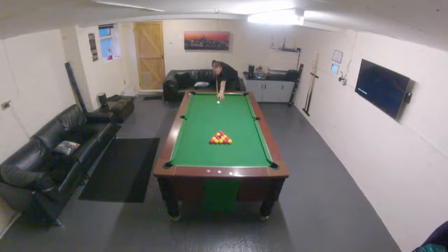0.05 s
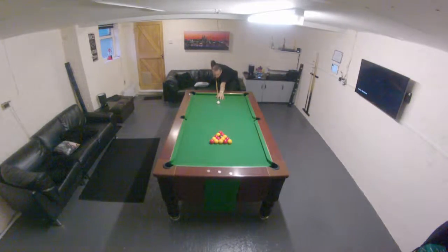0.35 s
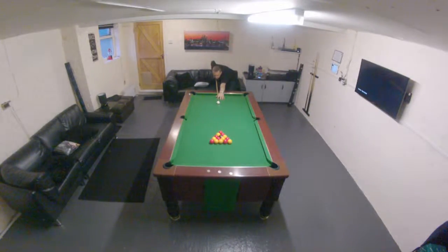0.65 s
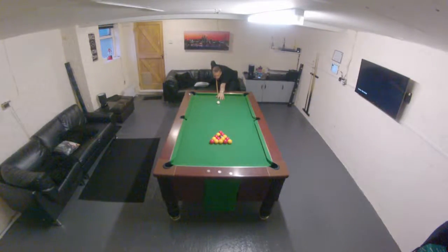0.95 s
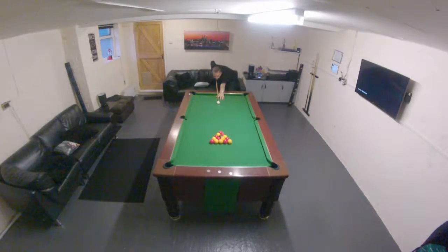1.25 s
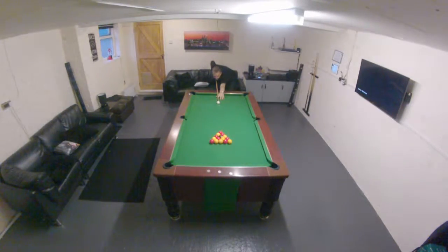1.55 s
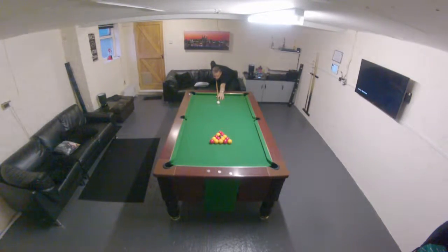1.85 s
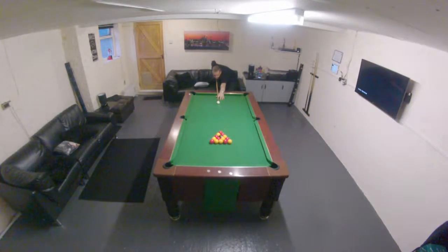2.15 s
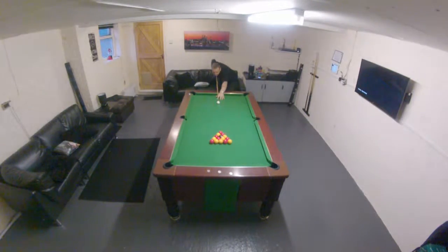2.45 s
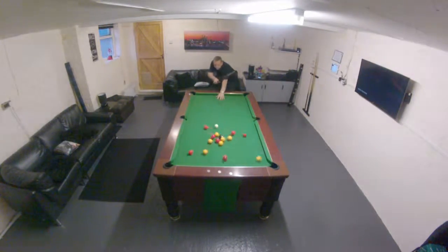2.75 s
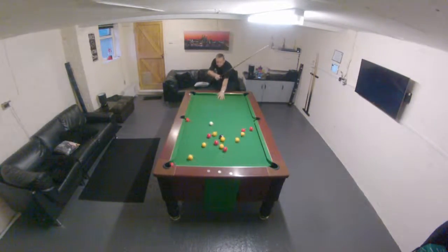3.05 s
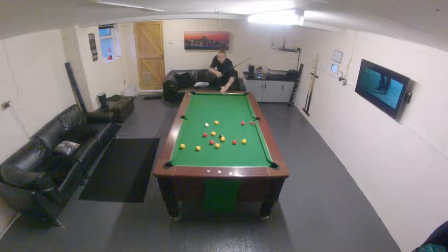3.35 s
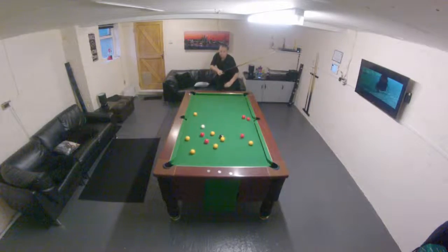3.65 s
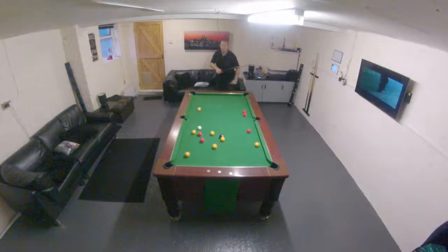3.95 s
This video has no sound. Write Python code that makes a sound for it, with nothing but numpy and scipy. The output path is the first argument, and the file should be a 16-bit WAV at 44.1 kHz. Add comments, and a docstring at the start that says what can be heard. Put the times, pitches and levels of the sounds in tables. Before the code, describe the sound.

A pool break: balls smash apart, then click and thump around the table in an echoing room.

```python
"""A bare, echoing games room: a pool break heard from the foot of the table.
A low hum fades and the cue slides over the hand. Its tip cracks against the white, which smashes into
the rack; the balls click together, thump the cushions and knock on the wooden rails and pockets, and one
rumbles away inside the table. Each contact is a short pulse plus room reflections, many with ringing
modes; the rumble is shaped noise. A limiter ducks after the smash."""
import sys
import numpy as np
from scipy import signal
from scipy.fft import rfft, irfft
from scipy.io import wavfile

SR = 44100
rng = np.random.default_rng(int(sys.argv[2]) if len(sys.argv) > 2 else 0)


def output_pcm(signal):
    """Save a mono or channel-first signal as 16-bit PCM at the path in sys.argv[1].

    Samples are clipped to [-1, 1] before scaling.
    """
    pcm = np.clip(np.atleast_2d(signal).T, -1, 1) * 32767
    wavfile.write(sys.argv[1], SR, np.round(pcm).astype(np.int16))


N = 176400
TIME = np.arange(N) / SR


def from_db(db):
    """Decibels to gain."""
    return 10 ** (np.asarray(db) / 20)


def unit_rms(x):
    """Scale to rms 1."""
    return x / np.sqrt(np.mean(x ** 2) + 1e-20)


def at_hz(points, hz):
    """Read a table on a log-frequency axis."""
    freq_hz, value = np.transpose(points)
    return np.interp(np.log(hz + 1), np.log(freq_hz), value)


def add(out, start_s, x):
    """Mix x into out from start_s."""
    i = int(start_s * SR)
    out[i:i + len(x)] += x[:N - i]


def noise(colour):
    """Steady noise of a given colour, rms 1."""
    gain = from_db(at_hz(colour, np.fft.rfftfreq(N, 1 / SR)))
    return unit_rms(irfft(rfft(rng.standard_normal(N)) * gain, N))


def drift(rate_hz):
    """Slow random wander, spread about 1."""
    return np.interp(TIME * rate_hz, np.arange(1000), rng.standard_normal(1000))


def contact(colour, tilt_db_per_oct, size=4096):
    """Minimum-phase pulse of one contact, with the energy of 10 ms at rms 1."""
    hz = np.fft.rfftfreq(size, 1 / SR)
    spectrum_db = at_hz(colour, hz) + tilt_db_per_oct * np.log2(hz + 20)
    cepstrum = irfft(np.log(from_db(spectrum_db)))
    cepstrum[1:size // 2] *= 2  # fold onto positive time
    cepstrum[size // 2 + 1:] = 0
    pulse = irfft(np.exp(rfft(cepstrum)))
    return unit_rms(pulse) * np.sqrt(.01 * SR / size)


def chatter(x, decay_s):
    """A rough contact: a dying burst of tiny touches."""
    t = TIME[:SR // 10]
    burst = rng.standard_normal(len(t)) * np.exp(-t / decay_s)
    return signal.fftconvolve(x, burst / np.sqrt(np.sum(burst ** 2)))


def room_tail(reflections_per_s=900, thicken_s=.05, gap_s=0.00077, build_s=0.004):
    """Reflections from one spot on the table: single at first, ever denser, dying band by band."""
    decays = [(80, 1), (250, 0.99), (1000, 0.7), (2800, 0.76), (5000, 0.6), (9000, 0.54), (15000, 0.32)]  # room decay: centre_hz, t60_s
    t, hz = TIME[:SR], np.fft.rfftfreq(SR, 1 / SR)
    density = np.minimum(reflections_per_s * (1 + t / thicken_s) ** 2 / SR, 1)
    arrivals = (rng.random(SR) < density) * rng.choice([-1, 1], SR) / np.sqrt(density)
    spectrum, tail = rfft(arrivals), 0
    for centre_hz, t60_s in decays:
        band = at_hz([(f, f == centre_hz) for f, _ in decays], hz)
        tail = tail + irfft(spectrum * band) * from_db(-60 * t / t60_s)
    return tail * np.clip((t - gap_s) / build_s, 0, 1) * np.sqrt(20 / SR)


def strikes(hits, colour, room_db, direct_hz, modes=(), echoes=(), chatter_s=None, swell_s=0.0072):
    """Per hit: a pulse, low-passed on the direct path, its echoes, the room's tail and a swelling ring."""
    out, t = np.zeros(N), TIME[:SR]
    lowpass = signal.butter(2, direct_hz, fs=SR, output="sos")
    swell = 1 - np.exp(-t / swell_s)
    for start_s, level_db, tilt_db_per_oct in hits:
        pulse = from_db(level_db) * contact(colour, tilt_db_per_oct)
        direct = signal.sosfilt(lowpass, chatter(pulse, chatter_s) if chatter_s else pulse)
        add(out, start_s, direct)
        add(out, start_s, from_db(room_db) * signal.fftconvolve(pulse, room_tail()))
        for delay_s, echo_db in echoes:
            add(out, start_s + delay_s, from_db(echo_db) * direct)
        for pitch_hz, mode_db, t60_s in modes:
            envelope = from_db(level_db + mode_db - 60 * t / t60_s) * swell
            add(out, start_s, envelope * np.sin(2 * np.pi * pitch_hz * t))
    return out


def smear(x, pitch_hz, width_hz):
    """A body takes a few cycles to swing up: an all-pass around its main pitch."""
    radius = np.exp(-np.pi * width_hz / SR)
    a = [1, -2 * radius * np.cos(2 * np.pi * pitch_hz / SR), radius * radius]
    return signal.lfilter(a[::-1], a, x)


def hum(pitch_hz=60.8, waver_hz=0.44):
    """A low, wavering sine that fades before the shot."""
    fade = [(0, -34.5), (.37, -34), (.45, -36.5), (.78, -37), (1.0, -50), (1.3, -48.5), (1.65, -44),
            (1.9, -49), (2.5, -79)]  # hum envelope: time_s, level_db
    phase = 2 * np.pi * np.cumsum(pitch_hz + waver_hz * drift(4.9)) / SR
    return from_db(np.interp(TIME, *np.transpose(fade))) * np.sqrt(2) * np.sin(phase)


def air(level_db=-48):
    """Room air: steady, bass-heavy noise."""
    colour = [(20, -21), (45, 1), (65, -3), (130, -10), (190, -18), (380, -23.5), (570, -29), (1030, -31.5),
              (1850, -37), (5000, -43), (14600, -49.5), (15900, -55)]  # air spectrum: freq_hz, gain_db
    return from_db(level_db) * noise(colour)


def squeaks(attack_s=0.022):
    """Two faint squeaks of narrow-band noise die in the room."""
    events = [(.035, 0.25, 5100, -61.5), (.955, 0.63, 6100, -65.5)]  # squeaks: start_s, t60_s, pitch_hz, level_db
    out = np.zeros(N)
    for start_s, t60_s, pitch_hz, level_db in events:
        band = signal.butter(2, [pitch_hz * .95, pitch_hz * 1.05], "band", fs=SR, output="sos")
        hiss = unit_rms(signal.sosfilt(band, rng.standard_normal(N)))
        age_s = np.maximum(TIME - start_s, 0)
        out += from_db(level_db - 60 * age_s / t60_s) * hiss * np.minimum(age_s / attack_s, 1)
    return out


def background():
    """Hum, air and squeaks, easing down together."""
    trim = [(0, 1.5), (.8, -1.5), (1.2, -1), (2.4, -2.5)]  # background envelope: time_s, gain_db
    return (hum() + air() + squeaks()) * from_db(np.interp(TIME, *np.transpose(trim)))


def cue_draw(start_s=2.06, end_s=2.54, attack_s=0.034, waver_hz=5, rub_db=-59.5):
    """The shaft slides over the hand with a thin whine."""
    partials = [(1110, -73.5), (1949, -76), (2223, -71.5), (3332, -81)]  # rubbing whine: pitch_hz, level_db
    rub_colour = [(150, -13), (500, -0.5), (1100, -13.5), (2200, -14), (4000, -25), (9000, -34.5)]  # friction spectrum: freq_hz, gain_db
    whine = np.zeros(N)
    for pitch_hz, level_db in partials:
        phase = 2 * np.pi * np.cumsum(pitch_hz + waver_hz * drift(67)) / SR
        whine += from_db(level_db) * np.sqrt(2) * np.sin(phase)
    gate = np.clip((TIME - start_s) / attack_s, 0, 1) * (TIME < end_s)
    return gate * (whine + from_db(rub_db) * noise(rub_colour))


def cue_strike():
    """The shaft knocks and rings; the tip's crack arrives mostly by way of the walls."""
    shaft_hits = [(2.5385, -12.5, 1)]  # stroke: start_s, level_db, tilt_db_per_oct
    shaft_colour = [(40, -24), (110, 5), (280, 3.5), (570, -3.5), (950, 4.5), (1450, -15.5), (1850, -10.5),
                    (2400, -30), (5000, -24.5), (15000, -68)]  # knock spectrum: freq_hz, gain_db
    shaft_modes = [(294, -29, 0.45), (491, -10.5, 0.41), (535, -21, 0.98), (910, -18, 0.18),
                   (1685, -23, 0.39), (1900, -13, 0.6), (1940, -17.5, 1), (3232, -20, 0.51),
                   (3280, -16.5, 0.69), (3720, -24, .3), (5290, -25, 0.35), (5390, -21, 0.32)]  # shaft ring: pitch_hz, gain_db, t60_s
    tip_hits = [(2.5385, -34.5, -2), (2.547, -36.5, 2)]  # tip on ball: start_s, level_db, tilt_db_per_oct
    tip_colour = [(500, 5.5), (1800, 8.5), (2600, 2.5), (5400, -4.5), (8000, -7), (14000, -11),
                  (16000, -20)]  # crack spectrum: freq_hz, gain_db
    knock = strikes(shaft_hits, shaft_colour, room_db=4, direct_hz=1540, modes=shaft_modes)
    crack = strikes(tip_hits, tip_colour, room_db=17.5, direct_hz=8900, chatter_s=.003)
    return smear(knock, pitch_hz=910, width_hz=1550) + crack


def rack_smash():
    """The white drives through the rack; the smash rings on briefly."""
    hits = [(2.6523, 2, 4), (2.6535, -7.5, 6)]  # white on rack: start_s, level_db, tilt_db_per_oct
    colour = [(25, -64), (70, -37), (140, 3.5), (500, -7), (1100, 0.5), (1500, -4), (2100, 0.5), (2700, -1),
              (3100, 0), (3600, -8.5), (4400, -15), (5400, -29.5), (8000, -50), (15000, -49.5)]  # smash spectrum: freq_hz, gain_db
    modes = [(2130, -37, .35), (2724, -24, 0.73), (2975, -11.5, 0.38), (3160, -28, 0.51)]  # smash ring: pitch_hz, gain_db, t60_s
    echoes = [(.0083, -13), (.0187, -11)]  # ceiling and wall: delay_s, gain_db
    return strikes(hits, colour, room_db=-3, direct_hz=5000, modes=modes, echoes=echoes)


def cushion_thumps():
    """Balls rebound from the cushions and set the table ringing."""
    hits = [(2.792, -20.5, -2), (2.81, -21, -5), (2.845, -18.5, 6.5), (2.882, -21, -0.5), (2.936, -20, 2),
            (2.995, -29, 6), (3.03, -26.5, -1.5), (3.075, -27, -8), (3.218, -16, 1.5), (3.232, -20, 4),
            (3.272, -24.5, 3), (3.303, -19.5, 2), (3.61, -36, 3.5)]  # rebounds: start_s, level_db, tilt_db_per_oct
    colour = [(35, -32), (55, -12), (80, -3.5), (180, 3.5), (290, -4.5), (450, -8.5), (750, -14.5),
              (1500, -21), (4000, -56.5), (12000, -93)]  # cushion spectrum: freq_hz, gain_db
    modes = [(80.2, -19, 1), (106.6, -1.5, 0.28), (173, -27, 1), (286, -13.5, 0.66), (428, -16, 0.29),
             (510, -17.5, 0.68), (659, -15.5, 0.53)]  # table ring: pitch_hz, gain_db, t60_s
    return strikes(hits, colour, room_db=5, direct_hz=596, modes=modes)


def rail_knocks():
    """Balls knock on the hard rails and pocket rims."""
    hits = [(2.829, -18.5, -2), (2.884, -31, -10), (2.93, -31.5, -1.5), (3.2915, -13.5, 0), (3.59, -61, 6),
            (3.6643, -38, 3.5)]  # knocks: start_s, level_db, tilt_db_per_oct
    colour = [(70, -33), (300, -12.5), (520, -11.5), (750, -5), (900, 5.5), (1080, 4.5), (1350, -8),
              (2000, -14), (3200, -51), (4600, -17.5), (7000, -42), (15000, -56)]  # rail spectrum: freq_hz, gain_db
    modes = [(910, -10.5, 0.91), (950, -18, 0.95), (1036, -17, 0.98), (1144, -10, 0.45), (4540, -34, 0.27)]  # rail ring: pitch_hz, gain_db, t60_s
    knocks = strikes(hits, colour, room_db=4, direct_hz=1900, modes=modes)
    return smear(knocks, pitch_hz=1090, width_hz=430)


def ball_clicks():
    """Loose balls meet in single clicks."""
    hits = [(2.8684, -27.5, -7), (2.9741, -40.5, 1.5), (3.0683, -29.5, 0), (3.0914, -29, -6),
            (3.1333, -35, -0.5), (3.1568, -26, -3.5), (3.1757, -36, -13)]  # collisions: start_s, level_db, tilt_db_per_oct
    colour = [(200, -35), (1000, -25), (1900, -2.5), (2800, 0), (3700, -9.5), (5000, -32), (6100, -31),
              (7600, -38), (9500, -31), (11200, -37), (12300, -31), (13400, -40), (14600, -29)]  # click spectrum: freq_hz, gain_db
    return strikes(hits, colour, room_db=5, direct_hz=9100)


def wood_clatter():
    """Sharp, rough contacts on wood."""
    hits = [(3.1995, -27.5, 3.5), (3.2035, -25, 0.5), (3.2915, -28.5, 4.5)]  # contacts: start_s, level_db, tilt_db_per_oct
    colour = [(60, -6), (300, 16), (900, 1), (1900, 4.5), (3000, -8), (5000, -8.5), (8000, -19),
              (14000, -28), (16000, -32)]  # clatter spectrum: freq_hz, gain_db
    return strikes(hits, colour, room_db=8, direct_hz=12800, chatter_s=.004)


def ball_roll(rough_db=-0.5):
    """A ball rumbles unevenly along the return channel."""
    envelope = [(3.35, -36), (3.48, -60), (3.65, -30.5), (3.8, -36), (4.0, -31)]  # rumble envelope: time_s, level_db
    colour = [(40, -23.5), (90, -3.5), (180, 0.5), (290, 3.5), (450, -9), (900, -13), (1400, -25.5),
              (3000, -32), (5000, -38.5), (9000, -57), (15000, -55)]  # rumble spectrum: freq_hz, gain_db
    level_db = np.interp(TIME, *np.transpose(envelope), left=-120) + rough_db * drift(45)
    return from_db(level_db) * noise(colour)


def wood_taps():
    """Light taps of ball on wood."""
    hits = [(3.589, -47.5, 1), (3.6635, -47, 4), (3.8892, -37, -0.5), (3.913, -40.5, -2)]  # taps: start_s, level_db, tilt_db_per_oct
    colour = [(80, -30), (300, 6.5), (800, -9), (1400, 4.5), (1900, -2), (2400, -7.5), (3000, -8.5),
              (5000, -17), (8000, -25.5), (14000, -45)]  # tap spectrum: freq_hz, gain_db
    return strikes(hits, colour, room_db=7.5, direct_hz=8100, chatter_s=0.0023)


def cabinet_thuds():
    """Dull thuds from below ring the cabinet."""
    hits = [(3.8135, -19.5, -0.5), (3.827, -25, -1.5), (3.897, -39, 5)]  # thuds: start_s, level_db, tilt_db_per_oct
    colour = [(25, -37), (55, 8.5), (110, 1.5), (170, -0.5), (280, -11), (500, -38.5), (1500, -28),
              (8000, -70)]  # thud spectrum: freq_hz, gain_db
    modes = [(60.5, -15, 1), (79, -28, .8), (172.7, -12, .6)]  # cabinet ring: pitch_hz, gain_db, t60_s
    return strikes(hits, colour, room_db=-2, direct_hz=406, modes=modes)


def scene():
    """Everything at one microphone."""
    cue = cue_strike()
    balls = smear(rack_smash() + ball_clicks(), pitch_hz=2940, width_hz=1430)
    table = cushion_thumps() + rail_knocks() + wood_clatter() + wood_taps() + cabinet_thuds()
    return (cue + balls + table + ball_roll() + cue_draw() + background())[None]


def record(dry):
    """A limiter ducks after the smash, too late to stop it clipping; deep bass and top are cut."""
    low_cut_hz, high_cut_hz = 33, 15400
    threshold_db, slope, attack_s, release_db_per_s = -4.5, 0.31, 0.0055, 31
    dry = signal.sosfilt(signal.butter(2, low_cut_hz, "high", fs=SR, output="sos"), dry)
    cut_db = np.maximum(20 * np.log10(np.abs(dry) + 1e-9) - threshold_db, 0) * slope
    release_db = release_db_per_s * TIME
    held_db = np.maximum.accumulate(cut_db + release_db, axis=-1) - release_db
    pole = np.exp(-1 / (attack_s * SR))
    duck_db = signal.lfilter([1 - pole], [1, -pole], held_db)
    clipped = np.clip(dry * from_db(-duck_db), -1, 1)
    return signal.sosfilt(signal.ellip(10, .1, 80, high_cut_hz, fs=SR, output="sos"), clipped)


dry = scene()
out = record(dry)
output_pcm(out)
```